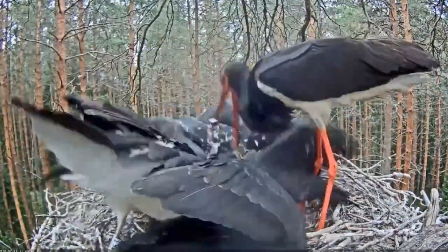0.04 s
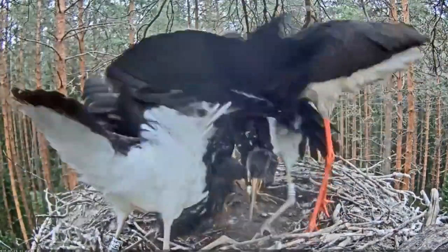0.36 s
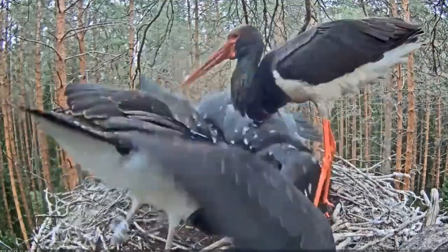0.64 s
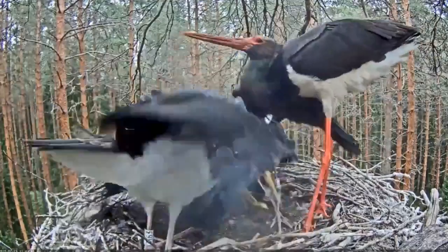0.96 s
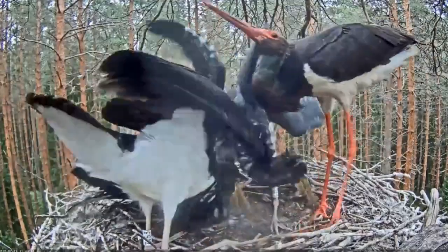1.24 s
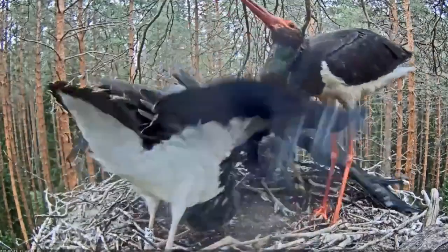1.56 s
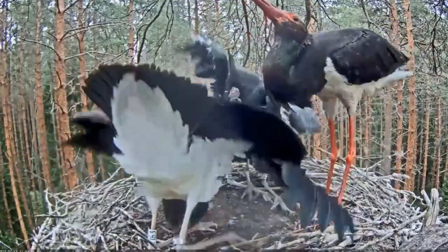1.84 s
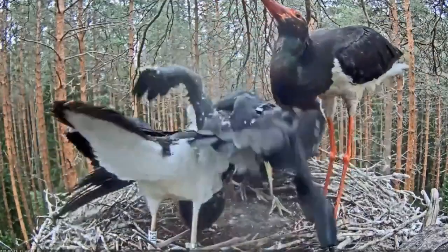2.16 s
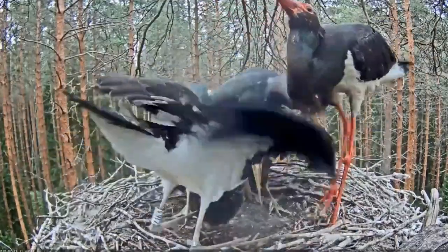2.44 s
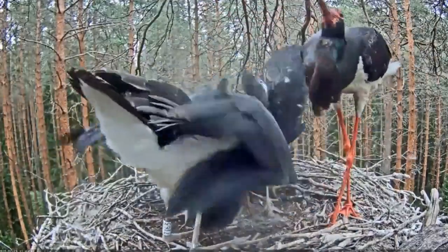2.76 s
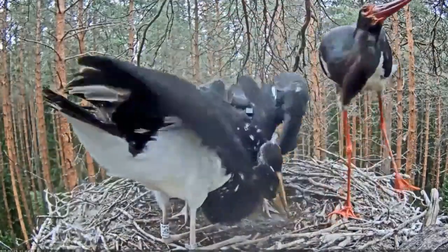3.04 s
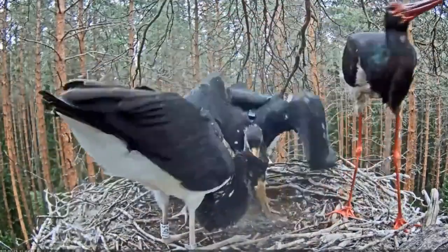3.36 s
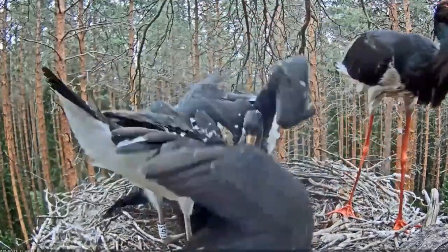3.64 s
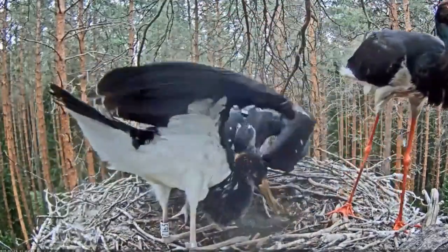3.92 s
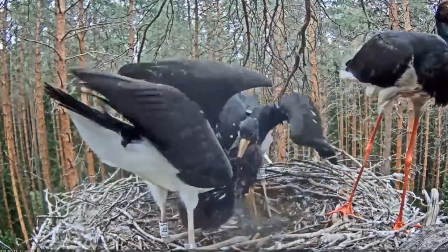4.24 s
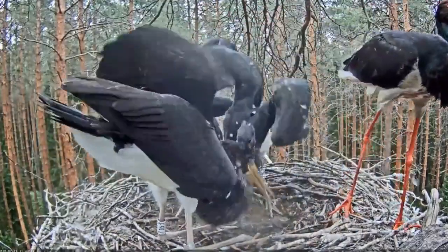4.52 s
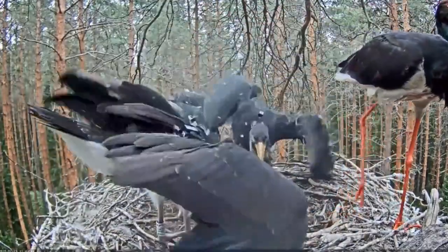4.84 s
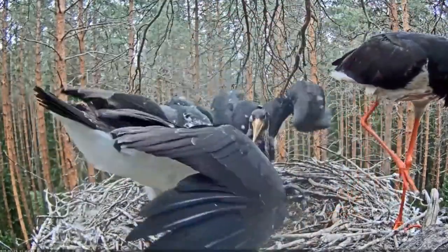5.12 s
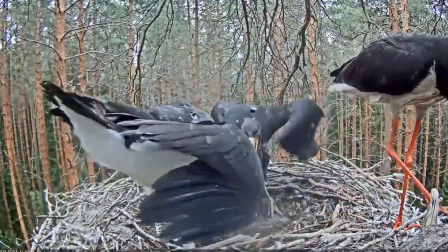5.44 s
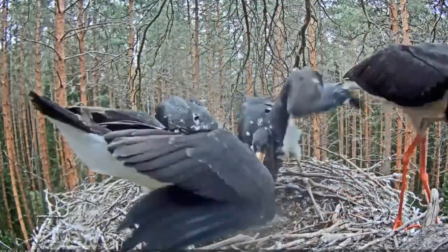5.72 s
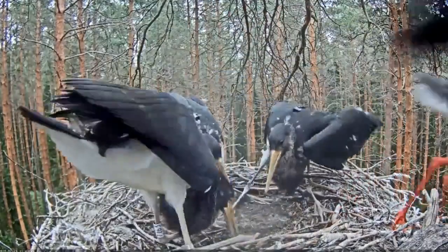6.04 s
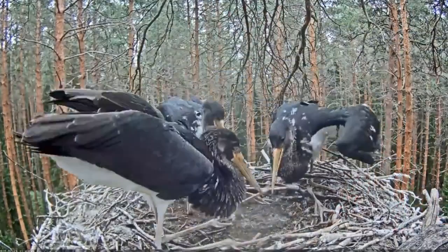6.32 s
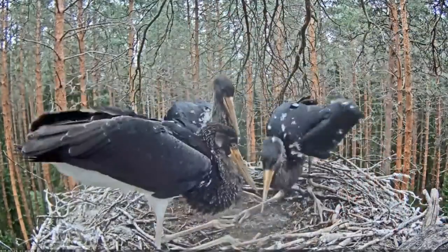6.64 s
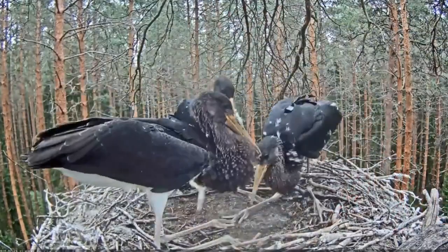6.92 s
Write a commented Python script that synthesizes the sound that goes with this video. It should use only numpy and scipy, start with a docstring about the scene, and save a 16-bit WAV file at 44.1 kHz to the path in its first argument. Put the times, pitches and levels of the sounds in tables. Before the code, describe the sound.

Young storks beg on a stick nest in a forest, several voices chittering at once in quick, raspy whistles mixed with short low croaks. Feathers brush and the nest crackles. In the first two seconds or so, twigs snap, wings slap and sticks knock sharply. The begging then grows louder and lower, with two brief falling hoots near the end. Stirred air rumbles softly on the microphone.

```python
"""Black stork chicks beg on a stick nest in a pine wood. From the start, three voices chitter in quick,
plunging whistles that follow the brood's excitement, over a rasp of pulsed breath; a bright hiss rises and
falls above them, the nest rustles and air buffets the microphone. A twig snaps, then come harsh squawks and low
croaks, pulse trains that ring in the throat. From 0.7 s to about 2 s, wings slap the nest and blows set its
sticks ringing. The begging grows louder and lower, and near the end two round, falling hoots sound."""
import sys
import numpy as np
from scipy import signal
from scipy.fft import rfft, irfft, next_fast_len
from scipy.io import wavfile
from scipy.ndimage import uniform_filter1d, map_coordinates

SR = 44100
rng = np.random.default_rng(int(sys.argv[2]) if len(sys.argv) > 2 else 0)


def transcribe(signal):
    """Save signal, clipped to [-1, 1], as a 16-bit WAV file at the path in sys.argv[1]."""
    frames = np.atleast_2d(signal).T
    limited = np.clip(frames, -1, 1)
    pcm = np.round(limited * 32767).astype(np.int16)
    wavfile.write(sys.argv[1], SR, pcm)


N = 312228
TIME = np.arange(N) / SR

# Low croaks, each with a flare of rasp: (t/s, length/s, level/dB, bill gape from 0 to 1)
CROAK_CALLS = [(0.247, 0.029, -41.5, 0.3), (0.46, 0.032, -37.5, 0.23), (0.497, 0.052, -43, 0.05),
               (0.911, 0.02, -42.5, 0.57), (1.157, 0.038, -35, 0.07), (1.409, 0.088, -39, 0.42),
               (2.401, 0.046, -39.5, 0.35), (2.507, .02, -46, 0.46), (2.686, 0.033, -45, 0.49),
               (2.997, 0.025, -42, 0.87), (3.049, 0.023, -41, 0.36), (3.261, 0.01, -38.5, 0.45),
               (3.315, 0.015, -41, 0.74), (3.34, 0.017, -39.5, 0.52), (3.527, 0.018, -42.5, 0.59),
               (3.56, 0.015, -44, 0.67), (3.623, 0.018, -40, 0.5), (3.752, 0.023, -41, 0.78),
               (3.794, 0.022, -38, 0.43), (4.02, 0.014, -37, 0.17), (4.11, 0.022, -38, 0.38),
               (4.156, 0.012, -40.5, 0.75), (4.214, 0.032, -44.5, 0.52), (4.426, .023, -41, 0.76),
               (4.475, 0.021, -41.5, 0.35), (4.683, 0.075, -40.5, 0.49), (4.797, 0.019, -38.5, 0.62),
               (4.877, 0.023, -42, 0.78), (4.964, 0.021, -38.5, 0.82), (5.003, 0.014, -38, 0.47),
               (5.08, 0.048, -38.5, 0.54), (5.381, 0.02, -38, 0.55), (5.477, 0.038, -41.5, 0.65),
               (5.55, 0.016, -43, 0.67), (5.665, 0.024, -39.5, 0.96), (5.767, 0.024, -38, 0.78),
               (5.871, 0.037, -37, 0.46), (6.168, 0.012, -35.5, 0.44), (6.242, 0.034, -38.5, 0.7),
               (6.424, 0.028, -43.5, 0.56), (6.527, 0.028, -35, 0.38), (6.748, 0.026, -35, 0.75),
               (7.071, 0.016, -37.5, 0.52)]
# Transmission of the whistle through the bill: (f/Hz, gain/dB)
BILL_RESPONSE = [(1200, -6), (1800, 0), (6500, 2), (9000, -14)]


def amp(db):
    """Amplitude ratio of a level in decibels."""
    return 10 ** (np.asarray(db) / 20)


def unit(x):
    """Normalisation to rms 1."""
    return x / np.sqrt(np.mean(x ** 2) + 1e-20)


def curves(rows):
    """Linear interpolation of each column after the time, one value per sample."""
    s, *cols = np.transpose(rows)
    return [np.interp(TIME, s, c) for c in cols]


def wobble(rate, size=N):
    """Slow noise: a spline through rate random knots a second."""
    knots = rng.standard_normal(int(size * rate / SR) + 4)
    return map_coordinates(knots, [np.arange(size) * rate / SR])


def filtered(x, response):
    """Linear filtering: the spectrum of x times a function of frequency."""
    m = next_fast_len(len(x) + SR // 10)
    return irfft(rfft(x, m) * response(np.fft.rfftfreq(m, 1 / SR)), m)[:len(x)]


def shaped(x, points):
    """Filtering by (f/Hz, gain/dB) points joined on a logarithmic frequency axis."""
    f, db = np.transpose(points)
    return filtered(x, lambda hz: amp(np.interp(np.log(hz + 1), np.log(f), db)))


def coloured(x, points):
    """Spectral shaping, normalised to rms 1."""
    return unit(shaped(x, points))


def mottled(x, patchy_db=5):
    """Random gain over time and frequency gives narrow, short-lived peaks and gaps."""
    spectra = signal.stft(x, nperseg=512)[2]
    field = uniform_filter1d(rng.standard_normal(spectra.shape), size=3, axis=0)
    field = unit(uniform_filter1d(field, size=3, axis=1))
    return signal.istft(spectra * amp(patchy_db * np.minimum(field, 2)), nperseg=512)[1][:N]


def friction(rate, spread_db, share):
    """Friction noise: a soft rub plus rate random impulses a second, of very unequal size."""
    impulses = (rng.random(N) < rate / SR) * rng.choice([-1, 1], N)
    sizes = amp(spread_db * np.minimum(rng.exponential(size=N), 4))
    return rng.standard_normal(N) + share * unit(impulses * sizes)


def add(track, s, sound):
    """Superposition of a sound on the track at time s."""
    part = track[max(0, round(s * SR)):][:len(sound)]
    part += sound[:len(part)]


def chitter(rows, voice_hz, hoarse, octave_db, arched=False):
    """Frequency-modulated whistles, loudest in the dip or, if arched, the crest; and a scratch envelope."""
    tone, overtones, scratch = np.zeros((3, N))
    warble, fray = 1 + .014 * wobble(160), wobble(1500)
    for s, fall, rise, hz, db in rows:
        edges = np.round((s + 1.4 * np.array([-fall, rise])) * SR).astype(int)
        part = slice(*np.clip(edges, 0, N))
        u = np.maximum((s - TIME[part]) / fall, (TIME[part] - s) / rise)
        crest_hz = min(1.18 * np.interp(s, TIME, voice_hz), 5000)
        crest_hz = np.clip(crest_hz, 1.09 * hz, 1.42 * hz)  # narrowest and widest swoop
        dip = (1 - hz / crest_hz) * (np.sin if arched else np.cos)(np.pi / 2 * u) ** 2
        pitch = crest_hz * (1 - dip) * warble[part] * (1 + .1 * dip * fray[part])
        phase = 2 * np.pi * (rng.random() + np.cumsum(pitch) / SR)
        swell = amp(db) * np.sqrt(2) / (1 + (u / .74) ** 4) * np.clip((1.4 - u) * 4, 0, 1)
        tone[part] += swell * np.sin(phase)
        overtones[part] += swell * (np.sin(2 * phase) + .3 * np.sin(3 * phase))
        scratch[part] += swell * dip
    # Uneven beating of the membranes modulates the amplitude and so adds sidebands.
    whistle = shaped(tone * (1 + hoarse * wobble(1800)), BILL_RESPONSE)
    # Transmission of the overtones through the bill: (f/Hz, gain/dB)
    overtone_response = [(3000, -24), (5500, -13), (6800, -9), (8300, -2), (10000, -4.5), (13000, -20.5)]
    overtones = shaped(overtones * (1 + .7 * wobble(900)), overtone_response)
    return whistle + amp(octave_db) * overtones, scratch


def babble(pitch_hz, level_db, spread, uneven_db, count):
    """Jitter and shimmer: rows of one chick's chirps, uneven in pace, length, pitch and strength."""
    pace, lean, height, force, stretch = np.clip(rng.standard_normal((count, 5)).T, -1.7, 1.7)
    s = (np.arange(count) + .5 + .35 * pace) / count * TIME[-1]
    length = .03 * np.exp(.35 * stretch)
    fall = length * (.5 + .17 * lean)
    hz = np.interp(s, TIME, pitch_hz) * np.exp(spread * (height - .5))
    db = np.interp(s, TIME, level_db) + uneven_db * np.minimum(force, 1)
    return np.c_[s, fall, length - fall, hz, db]


def voice_breaks(pitch_hz, level_db, count):
    """Irregular oscillation: a breaking voice scatters into very short, gliding notes."""
    out = np.zeros(N)
    when, height, slant, force, stretch = np.clip(rng.standard_normal((count, 5)).T, -1.7, 1.7)
    for k in range(count):
        s = (k + when[k] / 2) / count * TIME[-1]
        u = np.linspace(-1, 1, int(.022 * np.exp(.35 * stretch[k]) * SR))
        glide = np.exp(.22 * height[k] + .07 * slant[k] * u + .025 * wobble(500, len(u)))
        phase = 2 * np.pi * np.cumsum(np.interp(s, TIME, pitch_hz) * glide) / SR
        swell = amp(4.5 * force[k]) * np.cos(np.pi / 2 * u) ** 2
        add(out, s, swell * (np.sin(phase) + .1 * np.sin(3 * phase)))
    return unit(shaped(out, BILL_RESPONSE)) * amp(level_db)


def rasp(level_db, buzz_hz, depth):
    """Amplitude-modulated noise: air through the throats is chopped by loose, uneven pulses."""
    # Spectrum of hoarse breath: (f/Hz, level/dB)
    spectrum = [(700, -6), (1350, 4), (1750, 18), (2300, 11), (3600, 14.5), (4700, 0.5), (6200, -20),
                (8400, 0), (12000, -40)]
    cycle = np.cumsum(buzz_hz * (1 + .24 * wobble(60))) / SR
    breath = rng.standard_normal(N) * np.exp(depth * np.cos(2 * np.pi * cycle))
    return coloured(mottled(breath), spectrum) * amp(level_db + 4.3 * wobble(110))


def rasp_power(effort_db):
    """Incoherent powers add: a rasp that follows effort, and abrupt flares in croaks and squawks."""
    # Harsh, toneless squawks: (t/s at the peak, length/s, level/dB)
    squawks = [(0.109, 0.017, -27.5), (1.692, 0.036, -26.5), (5.483, 0.072, -27.5)]
    croak_half_s, ceiling_db = .029, -37.5  # croaks above the ceiling get no raspier
    flares = [(s + .67 * croak_half_s, croak_half_s, min(db, ceiling_db) + .5 + 8.5 * gape)
              for s, _, db, gape in CROAK_CALLS]
    flares += [(s, length / 2, db) for s, length, db in squawks]
    u = np.linspace(-3, 3, 61)
    flare = np.exp(-u ** 2) * (u > -.75)
    power = amp(effort_db - 10) ** 2
    for s, half, db in flares:
        power += np.interp(TIME, s + half * u, amp(db) ** 2 * flare, left=0, right=0)
    return power


def chicks(hiss_db):
    """Superposition of loud chirps and two ragged voices, low and shrill, all scratching in their dips."""
    # Excitement of the brood: (t/s, whistle f/Hz, effort level/dB)
    begging = [(0.0, 4155, -37), (0.22, 4880, -30.5), (0.31, 4330, -32.5), (0.36, 4860, -37.5),
               (0.41, 4340, -36), (0.63, 3845, -38.5), (0.78, 4970, -38), (0.84, 4420, -58),
               (0.98, 4314, -33), (1.17, 4085, -35.5), (1.42, 4340, -32), (1.5, 3290, -38.5),
               (1.58, 5340, -31.5), (1.64, 4785, -48), (1.73, 3890, -26.5), (1.8, 3980, -34),
               (1.97, 4274, -29), (2.15, 4250, -34.5), (2.18, 4300, -38), (2.33, 5430, -42),
               (2.39, 3577, -30.5), (2.62, 3216, -38.5), (2.84, 4383, -30), (3.12, 3070, -32.5),
               (3.25, 3090, -31.5), (3.77, 3934, -29.5), (3.98, 3140, -34), (4.1, 3122, -30),
               (4.57, 3720, -30.5), (4.94, 3064, -33.5), (5.07, 3950, -24.5), (5.36, 3843, -27),
               (5.53, 3700, -28.5), (5.63, 3440, -41), (5.79, 3333, -24), (6.02, 3956, -31),
               (6.23, 3210, -28.5), (6.55, 2890, -28.5), (6.66, 2840, -34), (6.74, 3014, -46),
               (6.82, 3895, -27), (7.08, 3650, -29.5)]
    # Chirps that stand out: (t/s at the dip, fall/s, rise/s, f/Hz in the dip, level/dB)
    chirps = [(0.026, 0.023, 0.011, 3830, -27), (0.192, 0.0062, 0.007, 4700, -30),
              (0.197, 0.0091, 0.014, 3300, -29), (0.229, 0.007, 0.014, 5800, -29),
              (0.407, 0.012, 0.011, 4530, -28.5), (0.882, 0.017, 0.0051, 4550, -22.5),
              (0.976, 0.014, 0.007, 4650, -27), (1.523, 0.0059, 0.0053, 4500, -24.5),
              (1.706, 0.007, 0.012, 4440, -22.5), (1.756, 0.028, 0.0052, 3370, -25),
              (1.844, 0.008, 0.0036, 4470, -22), (1.934, 0.007, 0.017, 4100, -22.5),
              (1.968, 0.007, 0.033, 4400, -27), (2.053, 0.0055, 0.007, 3610, -26),
              (2.403, 0.027, 0.0087, 3500, -31.5), (2.76, 0.0082, 0.0064, 4360, -29),
              (2.854, 0.028, 0.0097, 4250, -25.5), (2.937, 0.007, 0.007, 4300, -27),
              (2.961, 0.007, 0.0055, 4400, -27.5), (3.045, 0.015, 0.0053, 2965, -26),
              (3.295, 0.007, 0.023, 3100, -31.5), (3.334, 0.018, 0.0098, 2900, -27.5),
              (3.432, 0.035, 0.011, 2920, -27.5), (3.734, 0.007, 0.011, 4300, -33),
              (3.789, 0.02, 0.023, 3300, -30.5), (3.901, 0.013, 0.007, 2890, -26),
              (3.935, 0.0055, 0.021, 2810, -27.5), (4.037, 0.007, 0.0089, 2670, -28),
              (4.101, 0.007, 0.0062, 3060, -27), (4.141, 0.015, 0.014, 2690, -29),
              (4.38, 0.007, 0.014, 3170, -25), (4.424, 0.007, 0.007, 4430, -27),
              (4.47, 0.011, 0.01, 2970, -28), (4.649, 0.0076, 0.0084, 3550, -27.5),
              (4.747, 0.034, 0.007, 3330, -28), (4.797, 0.009, 0.024, 2000, -26),
              (4.901, 0.007, 0.016, 2920, -23.0), (5.019, 0.014, 0.02, 4090, -25.0),
              (5.068, 0.024, 0.015, 3760, -22.5), (5.112, 0.04, 0.016, 3680, -23),
              (5.144, 0.023, 0.037, 4150, -23.5), (5.22, 0.011, 0.0099, 4100, -18.0),
              (5.248, 0.012, 0.016, 3890, -22), (5.278, 0.011, 0.014, 3700, -21),
              (5.312, 0.014, 0.009, 3830, -23), (5.338, 0.015, 0.0064, 3910, -22),
              (5.354, 0.0062, 0.016, 4040, -23), (5.571, 0.007, 0.0133, 1940, -20),
              (5.592, 0.009, 0.0057, 2150, -26), (5.723, 0.0067, 0.017, 3100, -24.5),
              (5.787, 0.027, 0.034, 2990, -25.0), (5.827, 0.012, 0.023, 4000, -23.0),
              (5.881, 0.028, 0.011, 2480, -23.5), (5.917, 0.0059, 0.007, 2780, -23.5),
              (5.96, 0.0051, 0.01, 3710, -27.0), (6.2, 0.0077, 0.0091, 3580, -24.5),
              (6.254, 0.03, 0.007, 2900, -25), (6.334, 0.027, 0.011, 2690, -28.0),
              (6.467, 0.0082, 0.007, 3300, -26), (6.567, 0.0075, 0.019, 2980, -22.5),
              (6.693, 0.0085, 0.019, 2660, -29.5), (6.813, 0.007, 0.0085, 3790, -25),
              (6.85, 0.016, 0.0075, 3880, -21.5), (6.938, 0.011, 0.045, 3780, -25),
              (6.98, 0.0065, 0.007, 4700, -28)]
    pitch_hz, effort_db = curves(begging)
    frenzy_db = .3 * (hiss_db - np.median(hiss_db))  # harshest while the hiss is loudest
    hoarse = .29 * amp(1.6 * frenzy_db)
    loud, loud_scratch = chitter(chirps, pitch_hz, .5 * hoarse, octave_db=-22)
    low_rows = babble(pitch_hz, effort_db - 2, spread=.15, uneven_db=4, count=215)
    low, low_scratch = chitter(low_rows, .93 * pitch_hz, hoarse, octave_db=-15)
    high_rows = babble(.93 * pitch_hz, effort_db - 6, spread=.09, uneven_db=5, count=170)
    high_hz = pitch_hz * np.exp(.05 * wobble(30))
    high, high_scratch = chitter(high_rows, high_hz, 1.4 * hoarse, octave_db=-10, arched=True)
    # The lower voice gives way to the loud chirps.
    loud_power = np.abs(uniform_filter1d(loud ** 2, size=600))
    give_way = 1 / np.sqrt(1 + loud_power / amp(effort_db) ** 2)
    scratch_power = loud_scratch ** 2 + (give_way * low_scratch) ** 2 + high_scratch ** 2
    rasp_db = 10 * np.log10(rasp_power(effort_db + frenzy_db) + scratch_power * amp(frenzy_db - .5) ** 2)
    breaks = voice_breaks(.68 * pitch_hz, rasp_db - 4, count=700)
    breath = rasp(rasp_db - 5.5, buzz_hz=329.4, depth=.49)
    return amp(-.2) * loud + give_way * low + high + breaks + breath


def bright_hiss(level_db):
    """A bright, grainy hiss that swells and fades with uneven strokes."""
    # Spectrum of the bright hiss: (f/Hz, level/dB)
    spectrum = [(500, -13), (2000, -4.5), (5000, 6.5), (6800, 0), (8500, 0), (11000, -10), (14000, -23.5)]
    return coloured(mottled(friction(rate=800, spread_db=4, share=.57)), spectrum) * amp(level_db)


def nest_rustle(level_db):
    """Friction among the sticks makes a dull crackle as the birds shuffle."""
    # Spectrum of the shifting nest: (f/Hz, level/dB)
    spectrum = [(40, -4.5), (260, 7), (430, 0.5), (700, 7), (1100, 1), (3000, -0.5), (9000, -33)]
    return coloured(friction(rate=230, spread_db=3, share=1.26), spectrum) * amp(level_db)


def air_buffet(level_db):
    """Pressure fluctuations of stirred air rumble at the microphone."""
    # Spectrum of the buffeting: (f/Hz, level/dB)
    spectrum = [(24, -1.5), (110, -13), (600, -55)]
    return coloured(rng.standard_normal(N), spectrum) * amp(level_db)


def twig_snaps(t60):
    """Brittle fracture of thin twigs gives bright noise bursts that decay exponentially."""
    # Twigs breaking under feet and wings: (t/s, peak level/dB)
    fractures = [(0.103, -25), (0.749, -18.5), (0.797, -20), (1.464, -20.5), (1.669, -16)]
    # Spectrum of a crack: (f/Hz, level/dB)
    spectrum = [(400, -1), (1500, 14), (5000, -1), (10000, -4), (14000, -20)]
    out, t = np.zeros(N), np.arange(SR // 30) / SR
    for s, db in fractures:
        crack = coloured(rng.standard_normal(len(t)), spectrum) * amp(-60 * t / t60)
        add(out, s, amp(db) * crack / np.abs(crack).max())
    return out


def croaks(start_hz, fall, jitter, width_hz, low_db, throat_db):
    """Source and filter: falling pulse trains ring the throat, whose first mode rises as the bill opens."""
    # Upper resonances of the throat: (f/Hz, bandwidth/Hz, level/dB)
    upper_modes = [(1271, 44, -2.5), (1803, 540, -8), (2510, 870, -13.5)]
    shut_hz, open_hz = 622, 804
    out = np.zeros(N)
    for s, length, db, gape in CROAK_CALLS:
        modes = [(shut_hz + gape * (open_hz - shut_hz), width_hz, 0), *upper_modes]
        throat = lambda f: sum((-1) ** k * amp(gain) * 1j * f * width / (hz * hz - f * f + 1j * f * width)
                               for k, (hz, width, gain) in enumerate(modes))
        u = np.arange(int(2 * length * SR)) / (length * SR)
        pitch = start_hz * np.exp(.056 * rng.normal() - fall * u + jitter * wobble(400, len(u)))
        cycle = np.cumsum(pitch) / SR
        pulses = unit(np.diff(np.ceil(cycle), prepend=0))
        breath = .15 * rng.standard_normal(len(u))
        ring = unit(filtered(pulses + breath, throat))
        swell = np.clip(u / .18, 0, 1) / (1 + u ** 10) * amp(2 * wobble(500, len(u)))
        tilt = amp(34.5 * (gape - .5))  # opening the bill trades the fundamental for the ring
        voice = amp(low_db) * unit(np.sin(2 * np.pi * cycle)) + tilt * amp(throat_db) * ring
        add(out, s - .002, amp(db) * swell * voice / np.hypot(1, tilt))
    return out


def knocks(gain_db, thud_db):
    """Impacts excite heavily damped modes of the sticks; the nest gives way with a dull thud."""
    # Blows of bills, feet and wings: (t/s, level/dB, relative thud level/dB)
    impacts = [(0.724, -21.5, -12), (0.744, -24.5, -12.5), (0.982, -17.5, -24.5), (1.577, -24, -9),
               (1.634, -12.5, -22.5), (1.669, -24.5, -11.5), (2.097, -22, -17), (2.154, -6.5, -54),
               (3.858, -30, -6.5)]
    # Modes of the sticks: (f/Hz, level/dB, 60 dB decay time/s)
    stick_modes = [(823, 7, 0.018), (1143, 5.5, 0.017), (1620, 4.5, 0.023), (2600, 1, 0.01)]
    crack_spectrum = [(400, 12), (3000, 18), (7000, -13)]  # (f/Hz, level/dB), as for the thud
    thud_spectrum = [(40, 2), (90, -6.5), (260, -3), (500, -11), (12000, -78)]
    out, t = np.zeros(N), np.arange(SR // 10) / SR
    for s, db, low_db in impacts:
        ring = np.zeros(len(t))
        for hz, level, t60 in stick_modes:
            decay = amp(level + 2 * rng.normal() - 60 * t / t60)
            ring += decay * np.sin(2 * np.pi * hz * (1 + .033 * rng.normal()) * t)
        crack = coloured(rng.standard_normal(len(t)), crack_spectrum) * amp(-60 * t / .027)
        blow = shaped(ring + crack, [(250, -22), (600, 5)])  # thin sticks radiate little bass
        blow *= amp(gain_db) / np.abs(blow).max()
        thud = coloured(rng.standard_normal(len(t)), thud_spectrum)
        thud *= amp(low_db + thud_db - 60 * t / .074) * (1 - np.exp(-t / .0031))
        add(out, s + .000845, amp(db) * (blow + thud))
    return out


def wing_flaps():
    """Impact, then friction: a wing slaps the nest and drags over the twigs in a crackling swish."""
    # Wing strokes: (t/s, length/s, level/dB)
    strokes = [(0.737, .03, -31.5), (0.956, .046, -30), (2.064, .05, -32)]
    # Spectrum of the swish: (f/Hz, level/dB)
    spectrum = [(100, -2), (1200, 0), (3500, -4), (13000, -25)]
    gate = sum(amp(db) * np.interp(TIME, [s, s + .002, s + length / 2, s + length], [0, 1, 1, 0])
               for s, length, db in strokes)
    return gate * coloured(friction(rate=500, spread_db=3, share=1.5), spectrum)


def hoots(start_hz, fall):
    """Nearly sinusoidal oscillation: short, round notes that sag in pitch."""
    # Hoots about an octave above the croaks: (t/s, length/s, level/dB)
    notes = [(6.533, 0.025, -24.5), (6.596, 0.015, -34.5)]
    out = np.zeros(N)
    for s, length, db in notes:
        u = np.arange(int(2 * length * SR)) / (length * SR)
        pitch = start_hz * np.exp(-fall * u + .061 * wobble(300, len(u)))
        phase = 2 * np.pi * np.cumsum(pitch) / SR
        swell = np.clip(u / .18, 0, 1) / (1 + u ** 10)
        add(out, s, amp(db) * swell * unit(np.sin(phase) + amp(-19) * np.sin(2 * phase)))
    return out


def scene():
    """Superposition of voices, hiss, nest and air in one channel."""
    # Level of the bright hiss: (t/s, level/dB)
    hiss_levels = [(0.0, -46.5), (0.69, -57), (0.77, -51.5), (1.28, -56), (1.71, -48), (1.79, -57.5),
                   (2.13, -45), (2.19, -60.5), (2.96, -56), (3.19, -67.5), (3.39, -51.5), (3.77, -50),
                   (3.96, -61.5), (4.7, -49.5), (4.77, -64), (5.42, -51.5), (5.58, -64), (6.21, -58),
                   (6.74, -69)]
    # The birds' moving about: (t/s, air buffet level/dB, nest shuffle level/dB)
    movement = [(0, -42, -39), (.74, -47, -36), (1.34, -47.5, -40.5), (2.08, -46.5, -37),
                (2.22, -54.5, -45), (3.16, -58, -58), (3.9, -50.5, -47), (4.58, -55.5, -52),
                (6.36, -49.5, -48), (6.54, -35, -40.5), (6.7, -45, -42), (7.07, -53.5, -54)]
    hiss_db, = curves(hiss_levels)
    buffet_db, shuffle_db = curves(movement)
    croaking = croaks(start_hz=353.8, fall=.42, jitter=.062, width_hz=70, low_db=6, throat_db=9.5)
    strokes_db = 4.5 * np.tanh(wobble(45))  # the same uneven strokes drive the hiss and the nest
    rustle = bright_hiss(hiss_db + 12.5 + strokes_db) + nest_rustle(shuffle_db - 3.5 + 1.64 * strokes_db)
    air = air_buffet(buffet_db + 3.5)
    sticks = knocks(gain_db=1, thud_db=13.5) + twig_snaps(t60=.052)
    voices = chicks(hiss_db) + croaking + hoots(start_hz=658, fall=.2)
    return (voices + rustle + air + sticks + wing_flaps())[None]


def record(dry):
    """Band limiting: the nest camera passes nothing above 14 kHz."""
    return filtered(dry[0], lambda hz: hz < 14000)[None]


dry = scene()
out = record(dry)
transcribe(out)
```